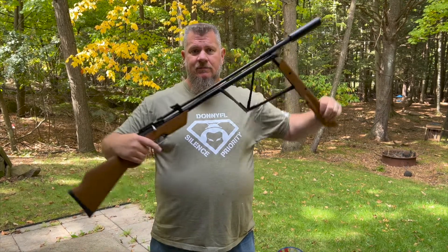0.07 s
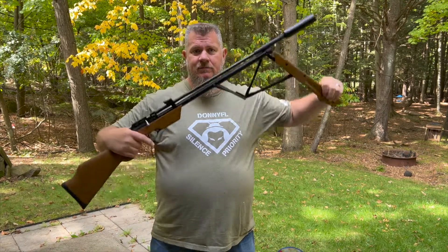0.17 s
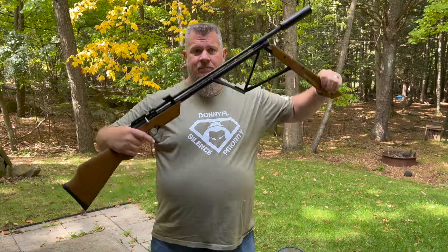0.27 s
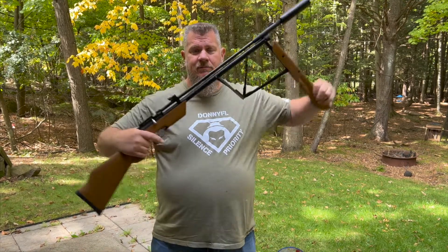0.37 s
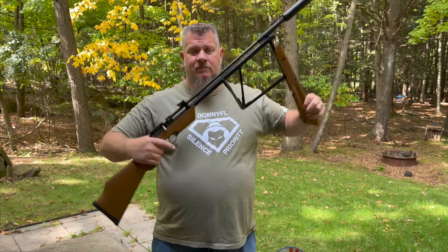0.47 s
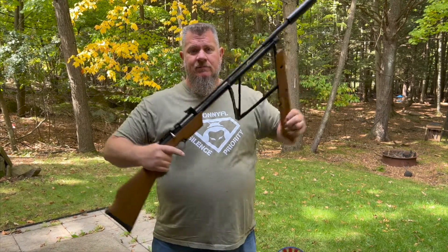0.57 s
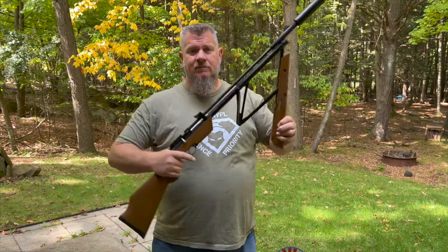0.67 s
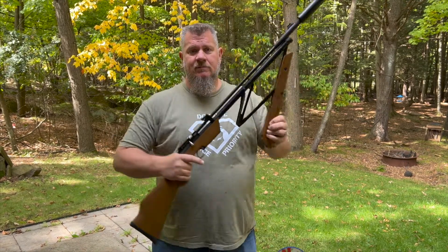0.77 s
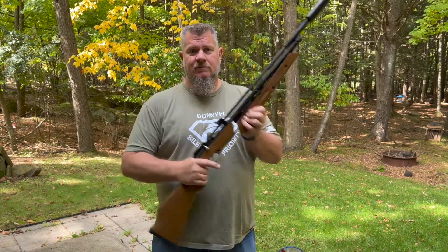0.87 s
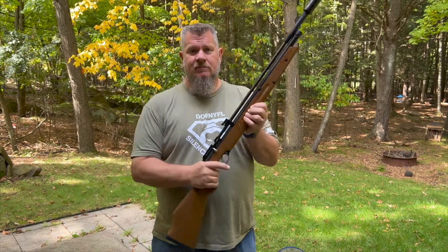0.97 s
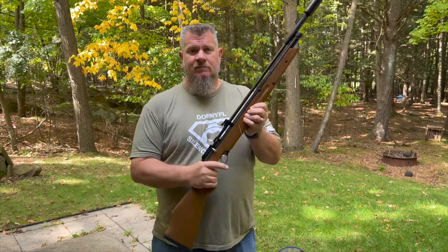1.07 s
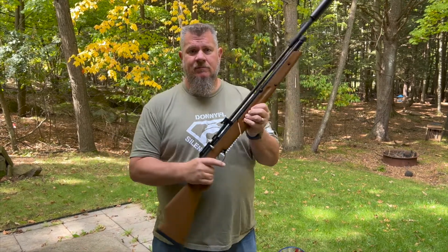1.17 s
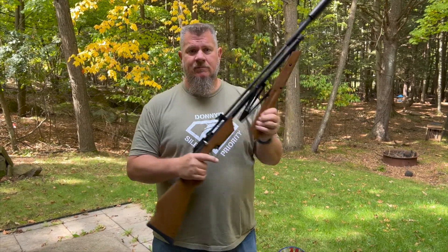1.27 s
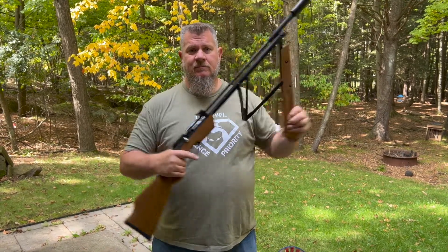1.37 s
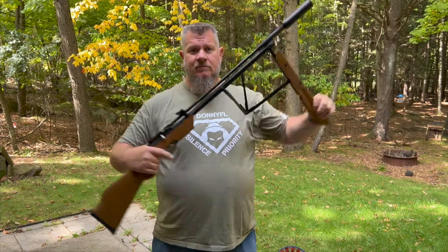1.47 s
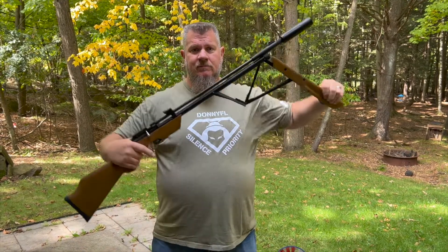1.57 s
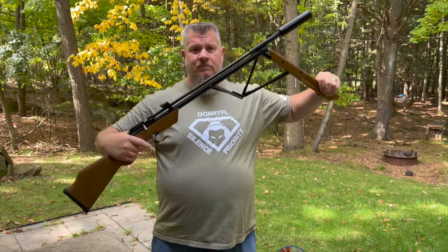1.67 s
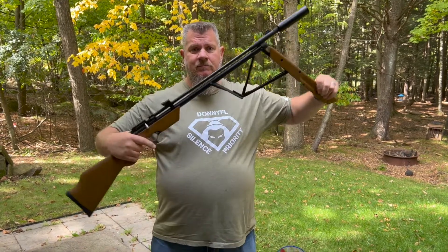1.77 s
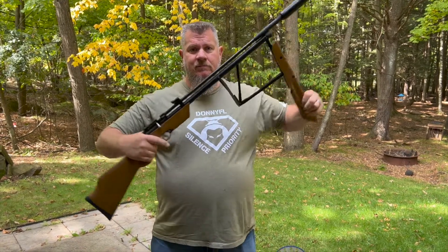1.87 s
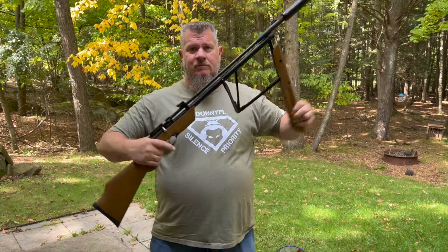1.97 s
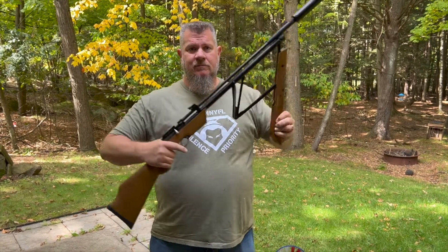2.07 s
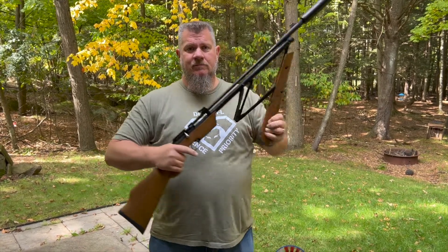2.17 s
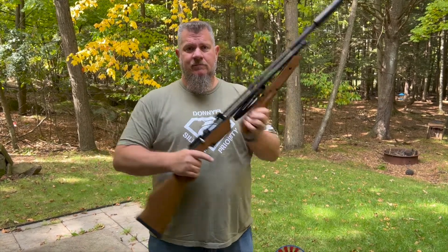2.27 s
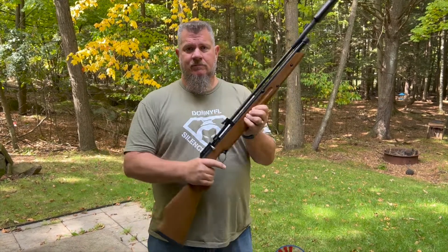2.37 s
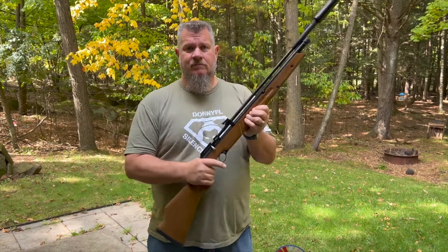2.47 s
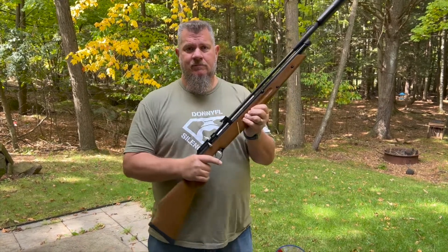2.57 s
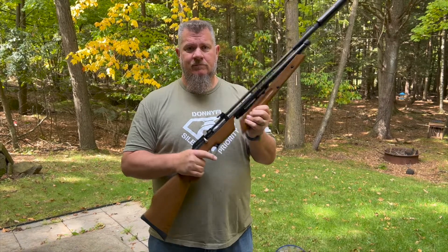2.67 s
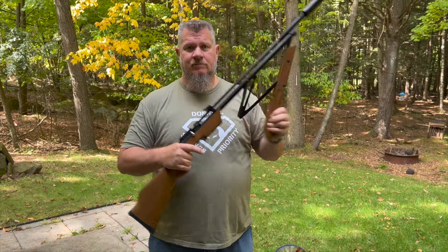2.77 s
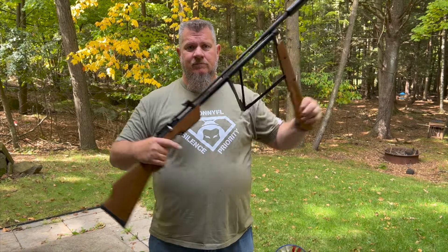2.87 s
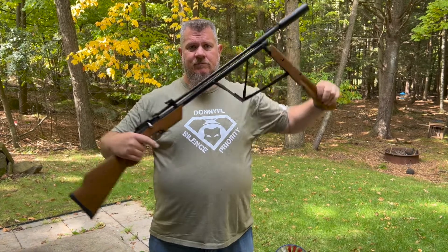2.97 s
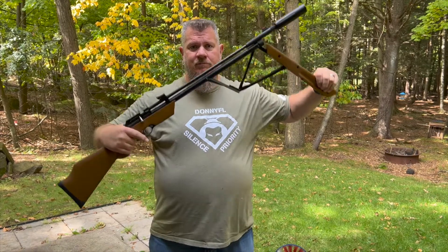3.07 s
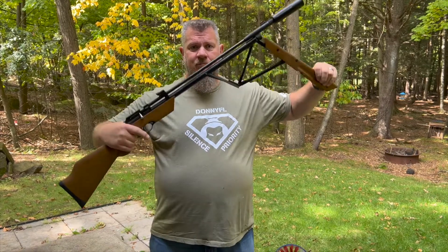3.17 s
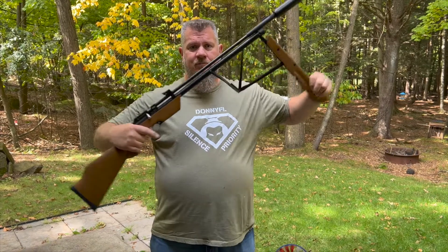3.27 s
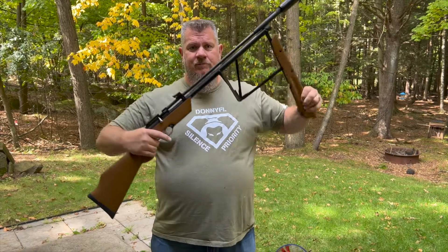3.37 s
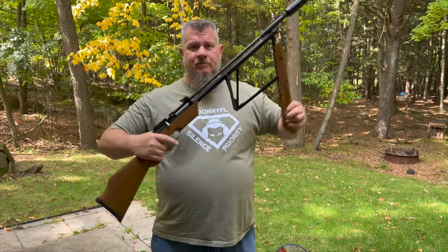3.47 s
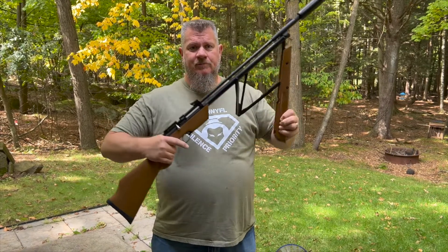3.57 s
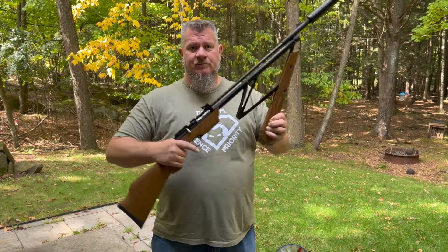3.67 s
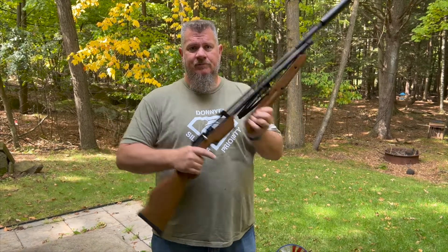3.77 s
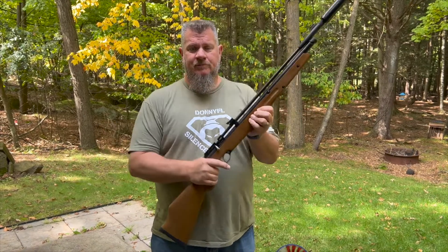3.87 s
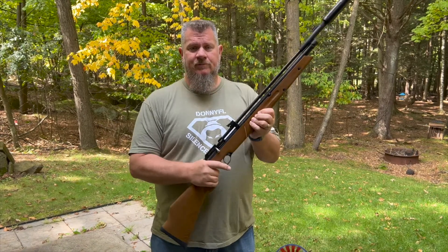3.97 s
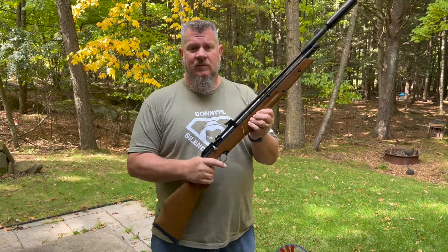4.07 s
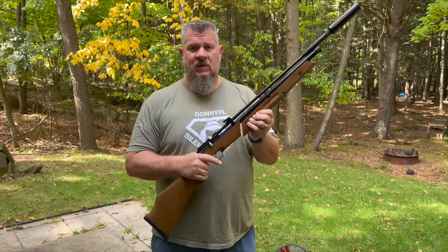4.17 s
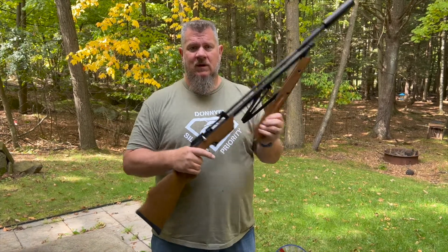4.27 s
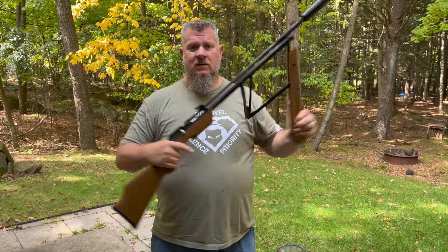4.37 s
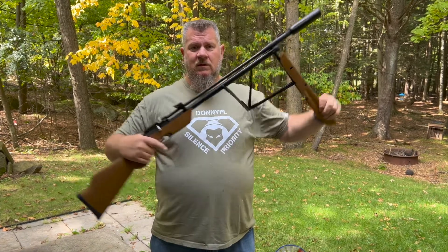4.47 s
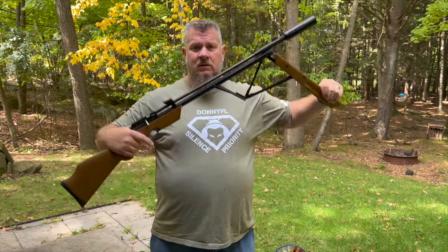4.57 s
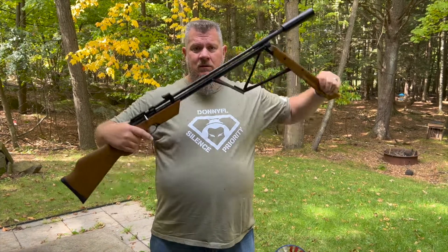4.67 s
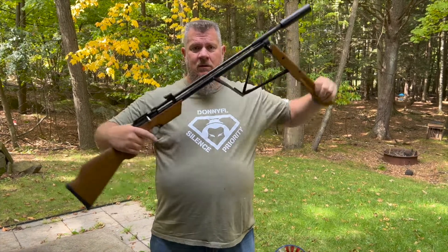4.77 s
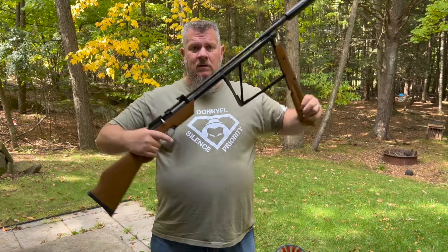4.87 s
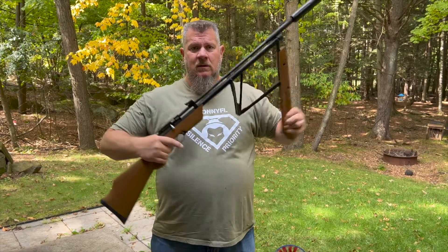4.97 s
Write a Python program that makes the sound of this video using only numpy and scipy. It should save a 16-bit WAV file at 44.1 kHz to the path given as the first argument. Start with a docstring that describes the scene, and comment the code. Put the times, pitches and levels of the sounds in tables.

```python
"""Pumping an air rifle on a lawn

The pump lever of an air rifle swings shut and open two metres from a phone, on a lawn among trees.
Steel links and the wooden grip clack: volleys of micro-impacts ring the modes of each part.
Ground and trunks scatter the clacks back as fading coloured noise.
The piston slides with a faint noise hiss and gliding squeaks, over banded noise of distant traffic.
"""
import sys
import numpy as np
from scipy import signal
from scipy.fft import rfft, irfft, next_fast_len
from scipy.io import wavfile
from scipy.ndimage import uniform_filter1d

SR = 44100
rng = np.random.default_rng(int(sys.argv[2]) if len(sys.argv) > 2 else 0)


def digitize_waveform(pressure):
    """Quantize a signal to 16-bit integers and store it at the path in sys.argv[1].

    Rows of a 2-D input are taken as channels; values are limited to [-1, 1].
    """
    field = np.atleast_2d(pressure).T
    bounded = np.clip(field, -1, 1)
    quanta = np.round(bounded * 32767).astype(np.int16)
    wavfile.write(sys.argv[1], SR, quanta)


N = 220764  # samples, about 5 s
FFT_SIZE = 2 * next_fast_len((N + 1) // 2, True)
HZ = np.fft.rfftfreq(FFT_SIZE, 1 / SR)
TIME = np.arange(N) / SR

# Modes of each part of the rifle: stock, receiver, grip, linkage, tube, pins; relative levels.
# columns: pitch_hz, level_db, t60_s
STOCK = [(1220, -26, 0.0059), (1272, 0, 0.0081), (1526, -0.5, 0.0096), (1814, -7.5, 0.022)]
RECEIVER = [(2144, -2.5, 0.027), (2158, -3.5, 0.02), (2000, -6, 0.017), (2589, -9.5, 0.026)]
GRIP = [(176, -17.5, 0.15), (366, -5.5, 0.038), (504.6, -11, 0.037), (615, 7.5, 0.012), (810, 5, 0.0089)]
LINKS = [(3134, 4, 0.0061), (3875, -6, 0.014), (4190, -6, 0.0085), (4730, 1, 0.0036)]
TUBE = [(5805, -0.5, 0.0031), (6800, -10, 0.015), (6670, -10, 0.011), (7450, -12.5, 0.0031),
        (7874, -0.5, 0.0024), (8300, -5, 0.0031)]
PINS = [(9400, -5.5, .003), (11430, -3.5, 0.003), (10580, 3.5, 0.0067), (13100, -3.5, 0.0082),
        (14940, -7.5, 0.0015), (14840, -25.5, 0.002)]
# The parts, in the same order.
# columns: modes, delay_s before it speaks, chatter_share of the contact's chatter length,
#          ground_echo_db, ground_t60_s, trees_echo_db, trees_t60_s
PARTS = [(STOCK, .0012, 0.7, -9, 0.16, -19.5, 0.73), (RECEIVER, 0.0012, 1.1, -6.5, 0.14, -23, 1),
         (GRIP, .002, 2.3, -9, 0.11, -11, 0.21), (LINKS, 0.0008, 0.89, -5, 0.23, -16.5, 0.73),
         (TUBE, 0.00027, 0.49, -6, 0.12, -17.5, .55), (PINS, .0001, 0.19, -25, 0.051, -18.5, 0.06)]

# How each kind of clack unfolds, one row a contact; place is in clack lengths from the clack's time.
# columns: place, stock_db, receiver_db, grip_db, linkage_db, tube_db, pins_db, chatter_s
SHUT = [(-.06, -13, -11.5, -35.5, -18.5, -9, -3, 0.0019), (.1, -5, -13, -29, -17, -20, -10, .0015),
        (.47, -7.5, -19.5, -14.5, -13.5, -20.5, -33.5, .0028),
        (.63, 1, -12.5, -30, -13, -10.5, -23, 0.0024), (1, -21.5, -39.5, -26.5, -31, -37, -45, 0.0027)]
OPEN = [(0, -13.5, -3, -26, -8.5, -4, -14, 0.0032), (1, -7, -32.5, -26.5, -24.5, -21, -10.5, 0.0072)]
CATCH = [(0, -30.5, -29, -45, -34, -35.5, -44.5, 0.0018), (.93, -28, -28.5, -34.5, -28, -22, -25.5, 0.004),
         (1.3, -25, -26.5, -33, -26.5, -28, -35.5, 0.0058)]
RELEASE = [(0, -4.5, -11.5, -21, -9, -2, -9.5, 0.0043), (1, -11, -7.5, -18, -16.5, -23, -7.5, .0032)]
FOLD = [(-.8, -40, -28, -47, -37, -32, -38, 0.0045), (-0.14, -22.5, -30, -30, -35.5, -27, -30.5, 0.0066),
        (0.93, -26, -23.5, -36, -33.5, -24, -31.5, .004)]
REBOUND = [(0, -28, -32.5, -34.5, -38.5, -36, -36.5, 0.0046),
           (1, -32.5, -33.5, -33.5, -32.5, -30, -31.5, 0.0059)]
TICK = [(0, -44, -49, -51.5, -58, -54.5, -54, 0.0041)]

# When each kind of clack happens; levels are added to those of its contacts.
# columns: start_s, length_s, level_db, later_contacts_db, brightness_db_per_octave
SHUTS = [(.865, .017, .5, 1, -0.9), (2.274, .0162, -1.5, 1.5, 0.54), (3.7778, .0168, -.5, 3, 0.6)]  # grip slams on the barrel
OPENS = [(.118, 0.0041, -0.5, 5, -0.041), (1.557, 0.0057, 0.56, 2.5, -0.073),
         (3.0086, .0052, 0.36, -0.6, -0.32), (4.555, .0074, -2, -2, -0.76)]  # links reach their stop
CATCHES = [(1.2184, .0208, 0.2, 1, .3), (2.6639, .0216, 5, -3.6, -0.33), (4.211, .0215, -2, 1.8, 0.2)]  # catch slips
RELEASES = [(1.2668, 0.0055, 0.41, -5.5, -.1), (2.7117, .0063, 0.64, -3.1, -.3),
            (4.2595, 0.0062, -0.24, -1, .3)]  # lever comes free
FOLDS = [(0.011, 0.011, -7, -3.5, 0.5), (1.4318, .0065, 2.5, 1, 0.29), (2.8872, .0075, 1.1, 0.4, 0.019),
         (4.4219, .0045, 0.6, 2.5, -0.55)]  # links take up their slack
REBOUNDS = [(.274, 0.011, -4.5, 2.5, 0.084), (1.72, .01, -1.5, -0.5, 0.13), (3.189, .004, 1, -6.5, -0.15),
            (4.7215, 0.0038, 3, -3, 0.72)]  # links settle after the stop
# Loose single ticks. columns: start_s, level_db, brightness_db_per_octave
TICKS = [(.048, 4, 6), (.056, 7, 4.5), (.3475, 1.5, -3.5), (.923, .6, 8), (1.05, 14, -0.4),
         (1.1054, 0.5, 3), (1.7923, -1, -3), (3.253, 1.8, -.6), (3.453, -2, 0.5), (4.831, -0.5, 2)]
PIVOT_HZ = 2000  # brightness turns about this pitch
LATER_PLACE = 0.2  # contacts beyond this place, in clack lengths, count as later
LEAD_IN_DB, LEAD_IN_S = -21, 0.0028  # noise swells briefly ahead of each contact

# Long rings of the steel after each slam and after each release.
# columns: pitch_hz, width_hz, level_db, t60_s
BARREL_RING = (1780, 190, -41, 1.0)
TUBE_RING = (6150, 500, -38, .5)

# Colour of the piston seal's hiss, dull and bright layers; relative levels.
# columns: pitch_hz, width_hz, level_db
SEAL_LOW = [(900, 1100, -12.5), (2520, 2200, 2.5)]
SEAL_HIGH = [(6000, 3300, -5.5), (11100, 5000, -23.5)]
# One pump cycle of the piston seal. columns: from_slam_s, hiss_db, brightness_db
CYCLE = [(-.75, -62.5, 6.5), (-.65, -66.5, -1.5), (-0.33, -82, 11), (-0.49, -53, -4), (0.012, -78.5, -7),
         (-0.31, -49.5, 2.5), (.11, -48, 6.2), (.36, -62.5, -5)]
# The cycles; offsets added to the hiss. columns: slam_s, before_slam_db, after_slam_db
CYCLES = [(-.6, 2, 26), (.865, 7.5, -5), (2.2763, 3, 3.5), (3.7767, 3.5, 1.5), (5.28, 4.5, 0)]
# Squeaks of the piston. columns: start_s, end_s, start_hz, end_hz, level_db
SQUEAKS = [(3.47, 3.56, 1860, 1800, -62), (3.47, 3.65, 2500, 2300, -62), (3.47, 3.6, 3080, 2960, -63),
           (2.05, 2.14, 4700, 4350, -75), (.79, .86, 6900, 6700, -72), (4.92, 4.98, 4500, 4300, -70)]

# Spectrum of the distant traffic, relative level per Hz. columns: pitch_hz, level_db
TRAFFIC = [(13, -38), (22, -30.5), (53, 1.5), (161, -16), (190, -18.5), (305, -20.5), (370, -25.5),
           (872, -22), (1320, -29), (1950, -33), (5890, -59.5), (9960, -50), (11100, -55.5), (15100, -50),
           (16400, -73.5)]
# Relative level of the lowest rumble over time. columns: time_s, level_db
SURGES = [(0.0, -47.5), (0.04, -43.5), (0.21, -47.5), (0.24, -37.5), (0.33, -44.5), (1.35, -49),
          (1.41, -45.5), (2.03, -46.5), (2.87, -42.5), (2.94, -36), (2.99, -47.5), (3.45, -41.5),
          (3.47, -35.5), (3.59, -46.5), (4.36, -43.5), (4.37, -47.5), (4.96, -41.5), (5.0, -46.5)]
TRAFFIC_DB = -43  # RMS ahead of the microphone ports

# The two microphone ports; near is the rifle, diffuse is all that comes from around.
# columns: pitch_hz, right_lead_rad, near_likeness, diffuse_likeness,
#          near_left_minus_right_db, diffuse_left_minus_right_db
PORTS = [(60, 0, .95, .8, -1.5, -.8), (500, -.2, .95, .6, -1.5, -1), (1200, -.2, .93, .1, -1, 0),
         (2200, -.35, .88, .1, .5, 0), (3300, -.2, .7, .1, -4, 1.5), (5600, -1, .4, .1, 0, 7),
         (7000, 0, .75, .3, 2, 2), (10000, 3.1, .97, .95, 0, 0), (12000, 5.4, .93, .9, 0, 0),
         (13000, 6.1, .95, .97, 0, 0), (14200, 6.5, .93, .95, 0, 0), (16500, 8.6, .8, .7, -1, 0)]
TOP_HZ = 16400  # upper edge of what the phone keeps


def lever():
    """Each contact is a quick volley of micro-impacts that rings all parts; two versions of every part."""
    lead = 1024  # samples kept ahead of a contact for the lead-in
    t = (np.arange(3072) - lead) / SR
    out = np.zeros((len(PARTS), 2, N + 4096))
    for start_s, part_db, chatter_s in contacts():
        for version in range(2):
            for k, ((modes, delay_s, share, *_), db) in enumerate(zip(PARTS, part_db)):
                impacts, scatter = rng.standard_normal((2, len(t)))
                lead_in = undb(LEAD_IN_DB) * np.exp(t / LEAD_IN_S)
                chatter = np.exp(-np.abs(t) / max(chatter_s * share, 1e-4))
                force = np.where(t < 0, lead_in, chatter)
                clack = signal.fftconvolve(impacts * undb(2.1 * scatter) * force, ring(modes))
                # level of the loudest 2 ms
                peak = np.sqrt(2 * uniform_filter1d(clack ** 2, size=88).max())
                i = int((start_s + delay_s) * SR)
                out[k, version, i:i + len(clack)] += undb(db) / peak * clack
    # each part is cut off a little below its first mode
    cuts = [signal.butter(2, .75 * part[0][0][0], "high", fs=SR, output="sos") for part in PARTS]
    return np.array([signal.sosfilt(cut, part[:, lead:lead + N]) for cut, part in zip(cuts, out)])


def contacts():
    """Every contact as (start s, dB of each part, chatter s); a bright clack favours the high parts."""
    octaves = np.log2([part[0][0][0] / PIVOT_HZ for part in PARTS])
    ticks = [(start_s, 0, db, 0, bright) for start_s, db, bright in TICKS]
    kinds = [(SHUT, SHUTS), (OPEN, OPENS), (CATCH, CATCHES), (RELEASE, RELEASES),
             (FOLD, FOLDS), (REBOUND, REBOUNDS), (TICK, ticks)]
    found = []
    for kind, clacks in kinds:
        for start_s, length_s, db, later_db, bright in clacks:
            for place, *part_db, chatter_s in kind:
                level_db = bright * octaves + part_db + db + later_db * (place > LATER_PLACE)
                found.append((start_s + place * length_s, level_db, chatter_s))
    return found


def ring(modes, scatter_db=8.0, detune=.03):
    """One blow's answer of a part: every blow finds the modes at other strengths and a little detuned."""
    t = np.arange(1024) / SR
    hz, db, t60 = np.array(modes).T[:, :, None]
    pitch_chance, level_chance, phase = rng.standard_normal((len(modes), 3)).T[:, :, None]
    tone = np.sin(2 * np.pi * (hz * (1 + detune * pitch_chance) * t + phase))
    decay = np.exp(-np.log(1000) * t / t60)
    return np.sum(undb(db + scatter_db * level_chance) * decay * tone, axis=0)


def steel_ring(clacks, hz, width_hz, db, t60):
    """After each of these clacks a steel part rings on unevenly, as narrow-band noise, and fades."""
    band = irfft(white() / (1 + (2 * (HZ - hz) / width_hz) ** 2))[:, :N]
    since = TIME - np.array(clacks)[:, :1]
    fade = np.sum((since > 0) * undb(db - 60 * np.abs(since) / t60), axis=0)
    return band / band.std() * fade


def yard(parts, gap_s=0.0063):
    """Ground and trunks each hear the rifle from another side: echoes are noise of each part's mean colour."""
    t, out = np.arange(SR) / SR, 0
    for (modes, _, _, *echoes), part in zip(PARTS, parts):
        fade = 0  # power of the echo of one click, ground plus trees
        for db, t60 in (echoes[:2], echoes[2:]):
            fade = fade + undb(2 * db - 120 * t / t60) * 2 * np.log(1000) / t60 / SR
        arrival = np.clip(t / gap_s, 0, 1)  # echoes build up over the gap
        power = signal.fftconvolve(np.mean(part ** 2, axis=0), fade * arrival)[:N]
        colour = 0  # power spectrum of the modes, smeared by their detuning
        for hz, db, t60 in modes:
            width = np.log(1000) / (np.pi * t60)
            spread = width + .035 * hz
            colour = colour + undb(2 * db) / width / spread / (1 + (2 * (HZ - hz) / spread) ** 2)
        low_cut = HZ ** 2 / (HZ ** 2 + modes[0][0] ** 2)
        noise = irfft(white() * np.sqrt(colour) * low_cut)[:, :N]
        out = out + noise / noise.std() * np.sqrt(np.maximum(power, 0)) * undb(1.5 * walk(160))
    return out


def piston():
    """The seal hisses along the tube, changing in brightness, and at times sticks into a wavering squeak."""
    time_s, hiss_db, bright_db = slide()
    noise = white()
    low, high = seal_noise(noise, SEAL_LOW), seal_noise(noise, SEAL_HIGH)
    hiss = (low + high * undb(np.interp(TIME, time_s, bright_db))) / low.std()
    hiss *= undb(np.interp(TIME, time_s, hiss_db) + 2.0 * walk(40))
    for start, end, start_hz, end_hz, db in SQUEAKS:
        hz = np.interp(TIME, [start, end], [start_hz, end_hz]) * (1 + .012 * walk(120))
        swell = np.sin(np.pi * np.clip((TIME - start) / (end - start), 0, 1))
        hiss += undb(db + 5 * walk(70)) * swell * np.sin(2 * np.pi * np.cumsum(hz) / SR)
    return hiss


def seal_noise(noise, seal):
    """Rubbing noise shaped by the broad humps of one seal layer."""
    shape = sum(undb(db) / (1 + (2 * (HZ - hz) / width) ** 4) for hz, width, db in seal)
    return irfft(noise * shape)[:, :N]


def slide():
    """The cycle of the seal repeated around every slam: (time s, hiss dB, brightness dB)."""
    return np.transpose([(slam + s, db + (before_db if s < 0 else after_db), bright_db)
                         for slam, before_db, after_db in CYCLES for s, db, bright_db in CYCLE])


def traffic():
    """Distant rumble in octave bands: the low ones surge, the others drift together and flicker alone."""
    noise = white() * undb(on_log(TRAFFIC, 1, HZ))
    out, swell = 0, walk(0.61)
    octave = np.log2(HZ + 1)
    surge = np.interp(TIME, *np.transpose(SURGES))
    surge -= surge.mean()
    for centre in np.arange(4, 15):  # 2 ** centre Hz
        share = np.clip(1 - np.abs(octave - centre), 0, 1)
        level_db = surge if centre < 7.5 else .6 * swell + 1.5 * walk(6)
        out = out + irfft(noise * share)[:, :N] * undb(level_db)
    return out * undb(TRAFFIC_DB) / out.std()


def ports(pair, diffuse):
    """Two unrelated versions of a sound become left and right with the ports' likeness, balance and phase."""
    table = np.array(PORTS)
    like = np.clip(on_log(table, 2 + diffuse, HZ), 0, 1)
    tilt = undb(on_log(table, 4 + diffuse, HZ) / 2)
    lead = np.exp(1j * np.interp(HZ, table[:, 0], table[:, 1]))
    mid = rfft(pair[0], FFT_SIZE) * np.sqrt((1 + like) / 2)
    side = rfft(pair[1], FFT_SIZE) * np.sqrt((1 - like) / 2)
    return irfft([(mid + side) * tilt, (mid - side) * lead / tilt])[:, :N]


def white():
    """Spectra of two unrelated white noises."""
    return rfft(rng.standard_normal((2, N)), FFT_SIZE)


def walk(rate):
    """Random levels held 1 / rate s and slewed twice; spread near 1."""
    hold = int(SR / rate)
    steps = np.repeat(rng.standard_normal(N // hold + 1), hold)
    return 1.3 * uniform_filter1d(uniform_filter1d(steps, hold), hold)[:N]


def on_log(table, column, hz):
    """A column of a table read between its frequencies, on a log pitch scale."""
    table = np.asarray(table, float)
    return np.interp(np.log(hz + 1), np.log(table[:, 0]), table[:, column])


def undb(db):
    """Amplitude factor of a level in dB."""
    return 10 ** (np.asarray(db) / 20)


def scene():
    """The rifle close by; its echoes, the piston and the traffic reach the ports as diffuse sound."""
    parts = lever()
    near = parts.sum(axis=0) + steel_ring(SHUTS, *BARREL_RING) + steel_ring(RELEASES, *TUBE_RING)
    around = yard(parts) + piston() + traffic()
    return ports(near, 0) + ports(around, 1)


def record(dry):
    """The phone clips peaks beyond .93 of full scale, then cuts the top steeply."""
    cut = signal.ellip(10, .2, 70, TOP_HZ, fs=SR, output="sos")
    return signal.sosfilt(cut, np.clip(dry, -.93, .93))


dry = scene()
out = record(dry)
digitize_waveform(out)
```